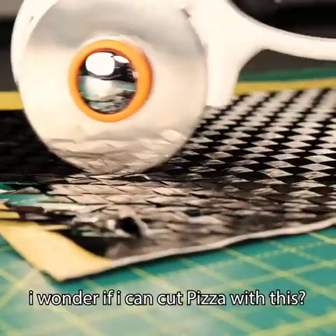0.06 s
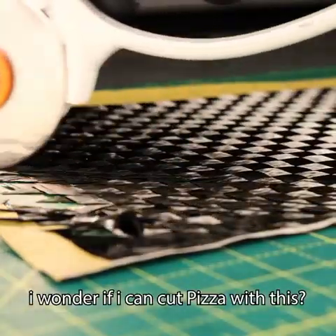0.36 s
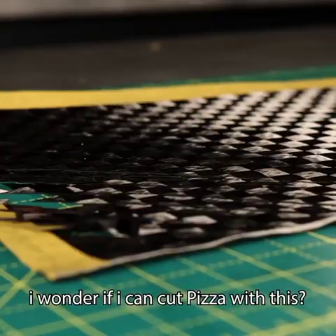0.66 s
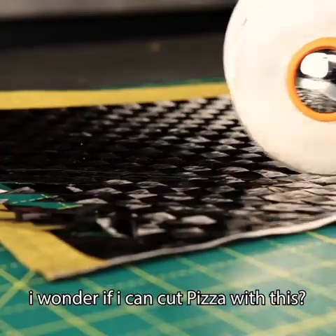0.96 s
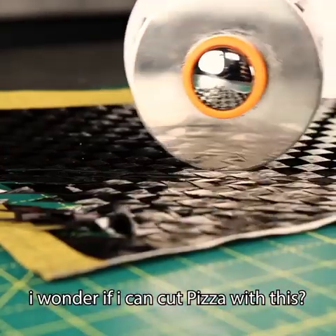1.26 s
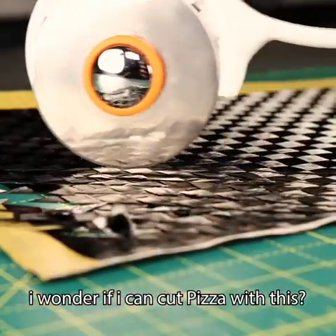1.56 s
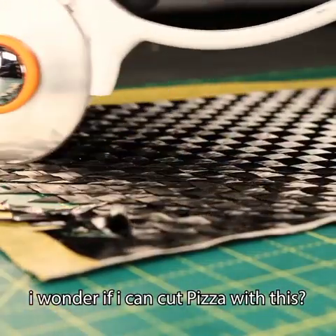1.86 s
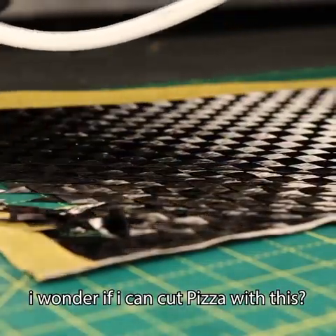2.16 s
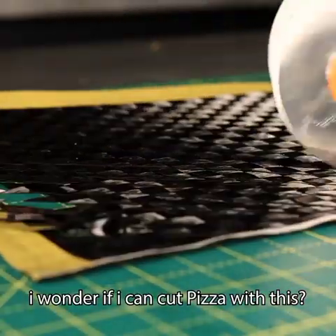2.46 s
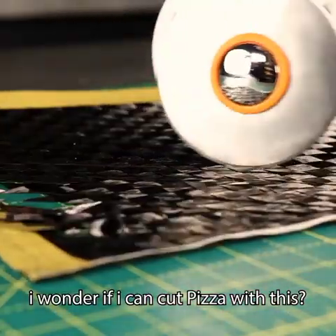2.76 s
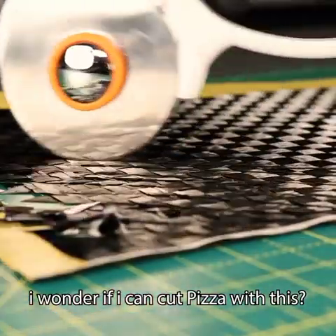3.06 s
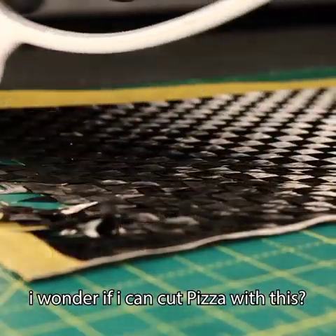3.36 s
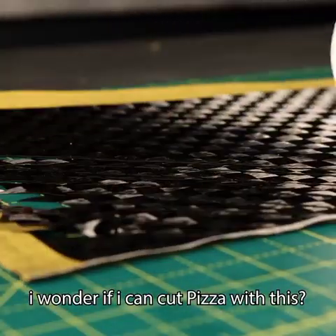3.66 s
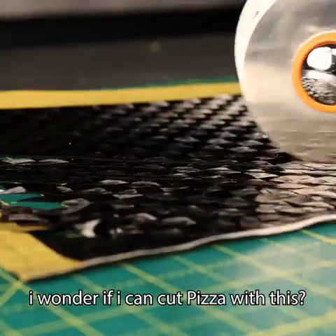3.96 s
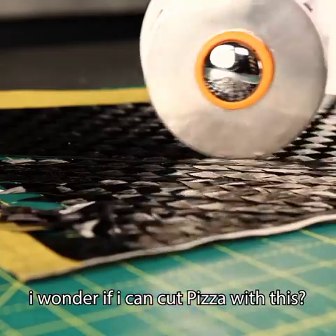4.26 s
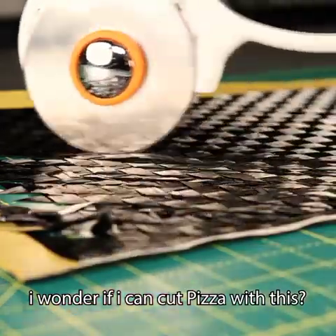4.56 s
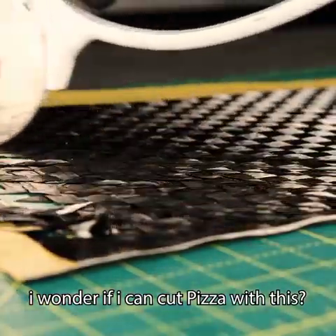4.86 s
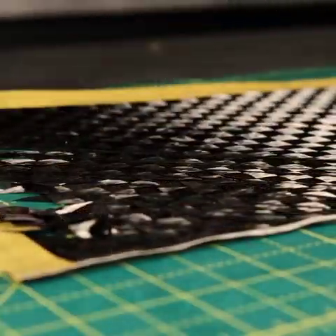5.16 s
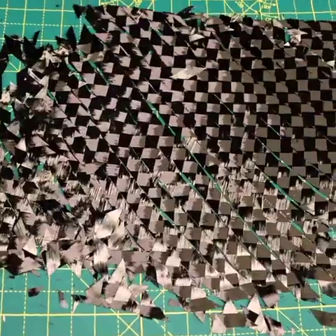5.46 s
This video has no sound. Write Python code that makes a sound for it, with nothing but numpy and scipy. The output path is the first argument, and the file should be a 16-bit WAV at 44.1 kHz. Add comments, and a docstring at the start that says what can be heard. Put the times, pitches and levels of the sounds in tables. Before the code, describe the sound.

Close to the microphone in a quiet room, a round blade crunches through stiff woven cloth with a dry, fizzing rasp. It makes four passes with hardly a gap, each with a slight metallic ring and a rising swish, while the table gives a few soft thumps. The cutting stops, the cutter taps lightly, and its plastic clicks sharply with a quick rustle.

```python
"""A dry rasp, close to the microphone: a rotary cutter rolls four times through carbon fibre cloth
on a cutting mat. Thousands of fibres snap under the blade and ring the cutter, mat and table;
each stroke sings briefly, brightens and swishes as the blade passes nearest.
Soft knocks come through the table. At the end come light taps of the cutter, a sharp plastic click
and a short rustle, then the air of a quiet room."""
import sys
import numpy as np
from scipy import signal
from scipy.fft import rfft, irfft
from scipy.io import wavfile
from scipy.ndimage import uniform_filter1d

SR = 44100
rng = np.random.default_rng(int(sys.argv[2]) if len(sys.argv) > 2 else 0)


def int16_out(signal):
    """Quantize to a 16-bit WAV file."""
    q = np.round(np.clip(np.atleast_2d(signal).T, -1, 1) * 32767)
    wavfile.write(sys.argv[1], SR, q.astype(np.int16))


N = 251811
TIME = np.arange(N) / SR
BINS_HZ = np.arange(4097) * SR / 8192
CLICK_S = 5.2736


def undb(db):
    return 10 ** (np.asarray(db) / 20)


def unit(x):
    """Scale to an rms of 1."""
    return x / np.sqrt(np.mean(x ** 2))


def curve(rows):
    """Join (time_s, value) rows by straight lines."""
    return np.interp(TIME, *np.transpose(rows))


def swell(rows, edge_s=0.002):
    """Gain from (time_s, level_db) rows, with soft edges and silence outside them."""
    inside = (TIME >= rows[0][0]) & (TIME <= rows[-1][0])
    return uniform_filter1d(undb(curve(rows)) * inside, int(edge_s * SR))


def fade(start_s, length_s, db, db_per_s):
    """Gain that starts at once, falls steadily and stops."""
    return swell([(start_s, db), (start_s + length_s, db - db_per_s * length_s)])


def hump(centre_s, half_s):
    """Smooth rise and fall of height 1."""
    return np.exp(-.5 * ((TIME - centre_s) / half_s) ** 2)


def wander(rate_hz):
    """Smooth random drift with an rms of 1."""
    hold = int(SR / rate_hz)
    steps = np.repeat(rng.standard_normal(N)[:N // hold + 1], hold)
    return unit(uniform_filter1d(steps, hold)[:N])


def crackle(per_s, spread_db):
    """Tiny breaks at random moments, most weak and a few strong."""
    breaks = rng.random(N) < per_s / SR
    size = undb(spread_db * np.minimum(rng.exponential(size=N), 5))
    return unit(breaks * size * rng.choice([-1, 1], N))


def response(gain):
    """Causal impulse response of unit energy, shaped by a gain over BINS_HZ."""
    cepstrum = irfft(np.log(gain + 1e-9))
    cepstrum[1:len(BINS_HZ) - 1] *= 2
    cepstrum[len(BINS_HZ):] = 0
    impulse = irfft(np.exp(rfft(cepstrum)))[:len(BINS_HZ)]
    return impulse / np.linalg.norm(impulse)


def colour(points):
    """Impulse response of a (frequency_hz, level_db) spectrum."""
    hz, db = np.transpose(points)
    return response(undb(np.interp(np.log(BINS_HZ + 1), np.log(hz), db)))


def bells(rows):
    """One spectral peak of height 1 for each (centre_hz, width_hz, ...) row."""
    rows = np.array(rows)
    return 1 / (1 + (2 * (BINS_HZ - rows[:, :1]) / rows[:, 1:2]) ** 2) ** 2


def through(x, impulse):
    return signal.oaconvolve(x, impulse)[:N]


def strike(events, impulse):
    """Sound an impulse response at each (start_s, peak_db)."""
    hits = np.zeros(N)
    for start_s, db in events:
        hits[int(start_s * SR)] += undb(db)
    return through(hits, impulse / np.abs(impulse).max())


def resonance(hz, width_hz):
    """A randomly driven resonance whose centre may glide."""
    t = TIME[:SR // 50]
    drive = rng.standard_normal(N) + 1j * rng.standard_normal(N)
    flutter = through(drive, t * np.exp(-2 * np.pi * width_hz * t))
    phase = 2 * np.pi * np.cumsum(hz * np.ones(N)) / SR
    return unit((flutter * np.exp(1j * phase)).real)


def treble_side(x, side_db=-5, above_hz=6300):
    """Stereo width: the treble alone, in opposite polarity left and right."""
    treble = signal.sosfilt(signal.butter(10, above_hz, "high", fs=SR, output="sos"), x)
    return undb(side_db) * np.array([[1], [-1]]) * treble


# Force on the blade, one list for each stroke: time_s, level_db
STROKE_FORCE = [
    [(0.0, -35), (0.12, -32), (0.31, -32), (0.52, -33.5), (0.672, -32.5)],
    [(0.673, -31.5), (0.86, -32), (1.2, -31.5), (1.36, -33), (1.5, -31.7), (1.66, -33.5), (1.96, -33),
     (2.26, -34.5)],
    [(2.286, -34), (2.58, -31), (2.79, -33.5), (2.92, -32), (3.08, -31.5), (3.28, -30.5), (3.533, -31)],
    [(3.552, -33), (3.8, -33), (4.07, -32.5), (4.18, -35), (4.4, -34.5), (4.6, -32.5), (4.87, -32),
     (5.152, -33)],
]
# Slack spots in the weave, where the blade meets few fibres: centre_s, dip_db
SLACK_SPOTS = [(.072, -5.5), (.155, -4), (.324, -3), (.673, -4), (.763, -3), (1.054, -4), (1.26, -4),
               (1.397, -6), (1.509, -4), (1.625, -6), (1.772, -3.5), (2.146, -4), (2.332, -4), (2.418, -3),
               (2.503, -4.5), (2.82, -4.5), (2.92, -3), (3.068, -4.5), (3.205, -3.5), (3.384, -3),
               (3.635, -5), (3.716, -5), (3.813, -4), (3.921, -4), (4.143, -4), (4.263, -3.5), (4.475, -4),
               (4.571, -4), (4.651, -4), (4.744, -3.5), (4.823, -4)]
# Thick bundles that part at once, in a quick flurry of fibres, and one flurry as the third stroke bites in:
# start_s, level_db
BUNDLE_SNAPS = [(.657, -26), (1.099, -29), (1.2, -29), (1.2805, -24), (1.5195, -21.5), (2.0682, -29),
                (2.254, -30), (2.2857, -34), (3.527, -26), (3.5565, -25), (3.647, -30), (4.341, -29),
                (4.6154, -29), (4.7521, -29), (5.0589, -29)]


def blade_work(lift_db=0.64, bundle_db=1.25, tow_db=0.49, slack_s_per_db=0.0023, snap_s=0.0014):
    """How hard the blade works: force, eased at slack spots, uneven across tows and bundles."""
    force = sum(swell(stroke) for stroke in STROKE_FORCE)
    weave_db = lift_db + bundle_db * wander(rate_hz=250) + tow_db * wander(rate_hz=28)
    slack_db = sum(db * hump(centre_s, slack_s_per_db * abs(db)) for centre_s, db in SLACK_SPOTS)
    snaps = strike(BUNDLE_SNAPS, np.exp(-TIME[:SR // 20] / snap_s))
    end_s = STROKE_FORCE[-1][-1][0]
    scrape = undb(-47) * (TIME < end_s)  # between strokes the cloth still scrapes a little
    coast = fade(end_s, CLICK_S - end_s, db=-43.5, db_per_s=141)
    return np.hypot(force * undb(weave_db + slack_db), scrape) + snaps + coast


# The blade's pass by the microphone in each stroke (place: 0 far end, 1 middle, 2 near end):
# nearest_s, approach_s, stop_place, fizz_db, swish_half_s, swish_hz, swish_db
BLADE_PASSES = [(0.52, 0.75, 1.7, -19.5, 0.092, 4970, -2), (2.05, 0.67, 1.55, -19.5, 0.11, 4864, -8.5),
                (3.45, 0.58, 1.8, -17, 0.12, 4080, -5), (5.068, 1, 1.96, -17.5, 0.12, 4446, -2)]


def blade_place(far_place=0.17, pass_place=1.29, ease_power=1.9, return_s=0.053):
    """In each stroke the blade starts far, slows as it nears the microphone and runs on to its stop."""
    place = np.zeros(N)
    for stroke, (nearest_s, approach_s, stop_place, *_) in zip(STROKE_FORCE, BLADE_PASSES):
        to_go = np.clip((nearest_s - TIME) / approach_s, 0, 1)
        distance = (pass_place - far_place) * to_go ** ease_power
        run_out = np.interp(TIME, [nearest_s, stroke[-1][0]], [pass_place, stop_place])
        place = np.where(TIME >= stroke[0][0], run_out - distance, place)
    return uniform_filter1d(np.clip(place, 0, 2), int(return_s * SR))


def splinters(work, place, db_per_place=3.9, clump_db=1.5):
    """The finest splinters come off in clumps and fizz more as the blade comes near."""
    levels = [(time_s, db) for stroke, (_, _, _, db, *_) in zip(STROKE_FORCE, BLADE_PASSES)
              for time_s, _ in stroke]
    fizz = undb(curve(levels) + db_per_place * (place - 1))
    return work * fizz * crackle(per_s=15000, spread_db=2.1) * undb(clump_db * wander(rate_hz=55))


# Resonances of table, mat and cutter, by blade place: pitch_hz, width_hz, far_db, middle_db, near_db
BODY_MODES = [(60.2, 27, -23.5, -25.5, -13.5), (114, 33.3, -19, -17.5, -7), (227, 29, -27, -22.5, -21.5),
              (328, 25, -24, -22.5, -14), (400, 220, -19, -20, -10.5), (628, 94, -11, -7, 3.5),
              (734.7, 30, -13, -9, -4.5), (1053, 175, -3.5, -6, -16), (1197.6, 37, -2.5, -1, -3),
              (1300, 67, -18, -4.5, 3.5), (1439, 158, -5.5, 0, -18.5), (1673, 320, -10, -8, 0),
              (1936, 98, -5, -8.5, 0.5), (2136, 110, -11, -13, 2.5), (2474, 330, -3.5, -4.5, -2),
              (2675, 260, -16, 0, -5), (2858, 140, 5, -2, -19.5), (3085, 240, -3, -13, -3),
              (3360, 860, -3.5, -3, -27), (3780, 200, -8.5, -7, -4.5), (4153, 310, -6.5, -10, -8.5),
              (4525, 550, -10, -7.5, -8), (5060, 520, -14.5, -11.5, -7), (5150, 510, -22, -10, -15),
              (5880, 1300, -23.5, -19.5, -9.5), (6850, 730, -33, -19.5, -35.5),
              (7920, 1100, -23.5, -20, -33.5), (8850, 728, -39, -27, -12.5), (11000, 3770, -12, -19.5, -23),
              (13700, 3242, -24, -41.5, -17.5)]
# Antiresonances, where neighbouring modes cancel: centre_hz, width_hz, dip_db
BODY_NOTCHES = [(850, 110, -4), (1880, 200, -4), (2260, 160, -2.5), (5620, 300, -1.5), (8380, 260, -5)]


def rasp(work, split_hz=8000, fibre_db=-1.22, splinter_db=0.5):
    """Snapping fibres ring table, mat and cutter; splinters fizz on top."""
    place = blade_place()
    fibres = work * crackle(per_s=13000, spread_db=2.4)
    fizz = splinters(work, place)
    mode_power = undb(np.array(BODY_MODES)[:, 2:].T) ** 2 @ bells(BODY_MODES)
    notch_db = np.array(BODY_NOTCHES)[:, 2] @ bells(BODY_NOTCHES)
    low = 1 / np.sqrt(1 + (BINS_HZ / split_hz) ** 20)
    high = np.sqrt(1 - low ** 2)
    out = np.zeros(N)
    for spot, body in enumerate(np.sqrt(mode_power) * undb(notch_db)):
        share = np.maximum(1 - np.abs(place - spot), 0)  # crossfade far, middle and near
        out += share * undb(fibre_db) * through(fibres, response(body * low))
        out += share * undb(splinter_db) * through(fizz, response(body * high))
    return out


# The blade's one note in each stroke: loudest_s, half_length_s, pitch_hz, gain_db
BLADE_NOTES = [(0.098, 0.12, 3290, -5), (1.17, 0.18, 2954, -10.5), (2.897, 0.27, 3323, -5.5),
               (4.84, 0.13, 2748, -1)]


def blade_song(width_hz=400):
    """The fibres drive a narrow resonance, and the blade sings."""
    return sum(undb(db) * hump(loudest_s, half_s) * resonance(hz, width_hz)
               for loudest_s, half_s, hz, db in BLADE_NOTES)


def swishes(rise_hz_per_s=1700, hiss_db=-9.5, hiss_half_s=0.095):
    """A rising swish, with a broader hiss above it, each time the blade passes the microphone."""
    hiss = undb(hiss_db) * resonance(hz=5933, width_hz=1110)
    out = np.zeros(N)
    for nearest_s, *_, half_s, hz, db in BLADE_PASSES:
        swish = resonance(hz + rise_hz_per_s * (TIME - nearest_s), width_hz=600)
        out += undb(db) * hump(nearest_s, half_s) * swish + hump(nearest_s, hiss_half_s) * hiss
    return out


# Short paths to the microphone off mat, handle and table: far_delay_ms, near_delay_ms, gain_db
NEAR_REFLECTIONS = [(.95, 1.092, -26.5), (1.5, 1.386, -28), (2.25, 2.554, -15.5), (3.9, 3.4, -21.5),
                    (6.4, 6.9, -21), (11.3, 11.1, -15)]


def reflect(x):
    """Near surfaces return the sound; their comb of notches slides as the blade travels."""
    travel = uniform_filter1d(blade_place(), SR // 10) / 2
    out = x
    for far_ms, near_ms, db in NEAR_REFLECTIONS:
        lag = (far_ms + (near_ms - far_ms) * travel) * SR / 1000
        out = out + undb(db) * np.interp(np.arange(N) - lag, np.arange(N), x)
    return out


def patchy(x, depth_db=3.5, centre_hz=6600, width_hz=3600, floor_share=0.2):
    """The colour shifts in small slow patches, mostly in the lower treble."""
    hz, _, frames = signal.stft(x, SR, nperseg=512)
    patches = rng.standard_normal(frames.shape)
    for _ in range(2):
        patches = uniform_filter1d(patches, size=3, axis=0)  # across frequency
        patches = uniform_filter1d(patches, size=24, axis=1)  # across time
    weight = floor_share + (1 - floor_share) / (1 + (2 * (hz - centre_hz) / width_hz) ** 6)
    shift_db = depth_db * weight[:, None] * unit(patches)
    return signal.istft(frames * undb(shift_db), SR)[1][:N]


def cutting(zing_db=-1):
    """The cut, close and in the centre; only its treble differs between left and right."""
    work = blade_work()
    direct = rasp(work) + undb(zing_db) * work * (blade_song() + swishes())
    return patchy(reflect(direct)) + treble_side(rasp(work))


# Soft knocks on the table: start_s, level_db
TABLE_KNOCKS = [(0.651, -44.5), (1.099, -40.5), (1.781, -55), (2.413, -43.5), (3.089, -49), (3.554, -38.5),
                (3.667, -53), (3.805, -50), (4.052, -38)]
# Low modes of the table: pitch_hz, t60_s, level_db
TABLE_MODES = [(157, 0.095, -1), (233, 0.072, 11), (291, 0.069, 7.5), (420, .02, -20)]


def knocks(gain_db=2.0):
    """Each knock rings the table's quickly decaying modes."""
    t = TIME[:SR // 4]
    ring = sum(undb(db - 60 * t / t60_s) * np.sin(2 * np.pi * hz * t) for hz, t60_s, db in TABLE_MODES)
    return undb(gain_db) * strike(TABLE_KNOCKS, ring)


# Light taps of the cutter after the last stroke: start_s, peak_db
CUTTER_TAPS = [(5.1915, -32), (5.199, -22.5), (5.2355, -36.5), (5.242, -40.5), (5.262, -41)]
# Spectrum of one tap: frequency_hz, level_db
TAP_SPECTRUM = [(100, -25), (400, -12), (720, 0), (1100, -16), (1420, 0), (2000, -7), (3500, -13),
                (5500, -21), (8500, -38), (14000, -46)]


def taps(tail_db=-23.5, tail_s=0.012):
    """The cutter taps lightly; the small room gives each tap a short tail."""
    hits = strike(CUTTER_TAPS, colour(TAP_SPECTRUM))
    t = TIME[:SR // 20]
    tail = rng.standard_normal(len(t)) * np.exp(-t / tail_s)
    return hits + undb(tail_db) * through(hits, tail)


# Ring of the cutter's plastic, heard close: frequency_hz, level_db
PLASTIC_SPECTRUM = [(60, -30.5), (200, -14), (330, -5), (500, -11), (780, 2.5), (960, -21.5), (1550, 0.5),
                    (2050, -3), (2400, -3), (2800, 5), (3700, 2.5), (4500, -5.5), (5600, -2.5),
                    (6800, -14.5), (7300, -9.5), (8300, -24.5), (11000, -19.5), (14000, -27.5)]


def plastic_click(lead_s=0.0033, touch_db=-13.5, blow_db=-1, chatter_db=-9.5):
    """A light touch, the blow and a quick chatter of contacts ring the same plastic."""
    plastic = colour(PLASTIC_SPECTRUM)
    hits = strike([(CLICK_S - lead_s, touch_db), (CLICK_S, blow_db)], plastic)
    since_s = TIME - CLICK_S
    rise_s, decay_s = 0.0008, 0.0018
    burst = np.exp(-np.abs(since_s) / np.where(since_s < 0, rise_s, decay_s))
    chatter = through(burst * crackle(per_s=12000, spread_db=1), plastic)
    return hits + undb(chatter_db) * chatter


# Spectrum of the rustle behind the click: frequency_hz, level_db
RUSTLE_SPECTRUM = [(40, -23), (120, -7), (200, -11.5), (600, -8), (1050, -15.5), (1800, -3), (3200, -6.5),
                   (5500, -14.5), (7600, -17.5), (8500, -22.5), (10500, -21), (14000, -31.5)]


def rustle():
    """A dense crackle starts with the click, fades fast and stops."""
    mid, side = (through(crackle(per_s=12000, spread_db=1.5), colour(RUSTLE_SPECTRUM)) for _ in range(2))
    return fade(CLICK_S, length_s=0.081, db=-33.5, db_per_s=324.5) * (mid + treble_side(side))


# Room tone around the table, heard alone at the end: frequency_hz, level_db
ROOM_SPECTRUM = [(15, -36.5), (25, -2), (38, -10.5), (173, -13.5), (392, -18), (616, -22), (846, -25.5),
                 (2640, -30), (5540, -31.5), (14000, -38)]


def room_tone(level_db=-72, rumble_db=-11, rumble_below_hz=170):
    """Faint steady air; only its rumble and its hiss differ between left and right."""
    mid, side = (through(rng.standard_normal(N), colour(ROOM_SPECTRUM)) for _ in range(2))
    rumble = signal.sosfilt(signal.butter(2, rumble_below_hz, fs=SR, output="sos"), side)
    return undb(level_db) * (mid + undb(rumble_db) * np.array([[1], [-1]]) * rumble + treble_side(side))


def scene():
    """Everything that reaches a stereo microphone close to the mat."""
    return cutting() + knocks() + taps() + plastic_click() + rustle() + room_tone()


def record(dry, ceiling=0.6, top_hz=14250):
    """The recorder rounds the loudest peak and cuts the top steeply."""
    rounded = ceiling * np.tanh(dry / ceiling)
    return signal.sosfilt(signal.ellip(10, .2, 70, top_hz, fs=SR, output="sos"), rounded)


dry = scene()
out = record(dry)
int16_out(out)
```